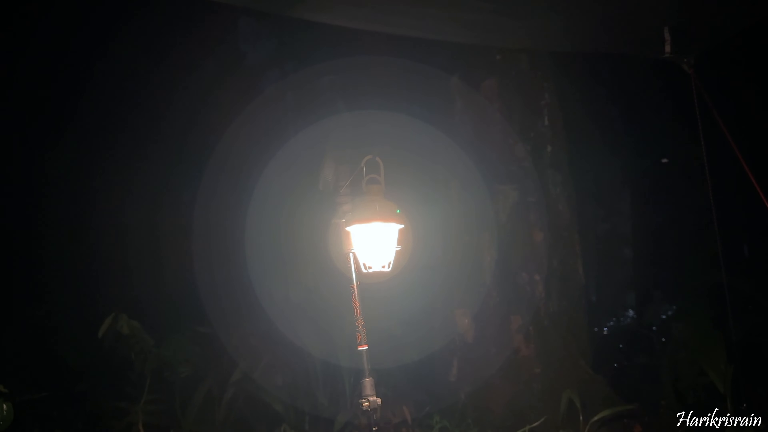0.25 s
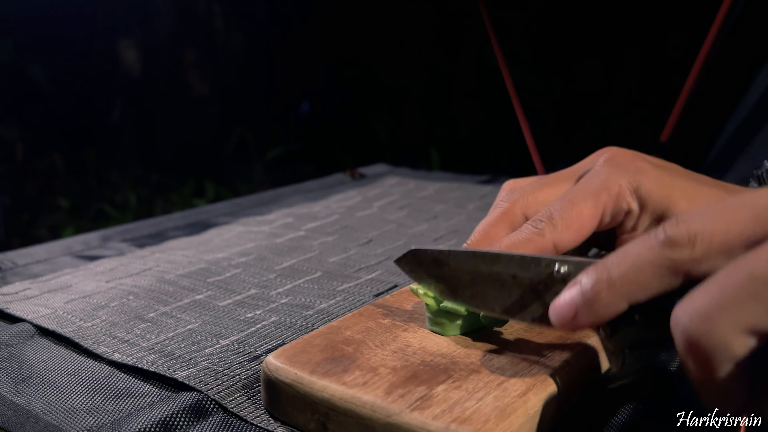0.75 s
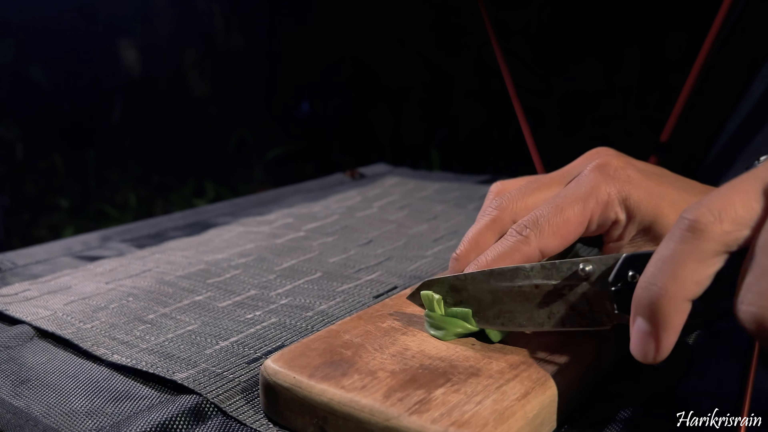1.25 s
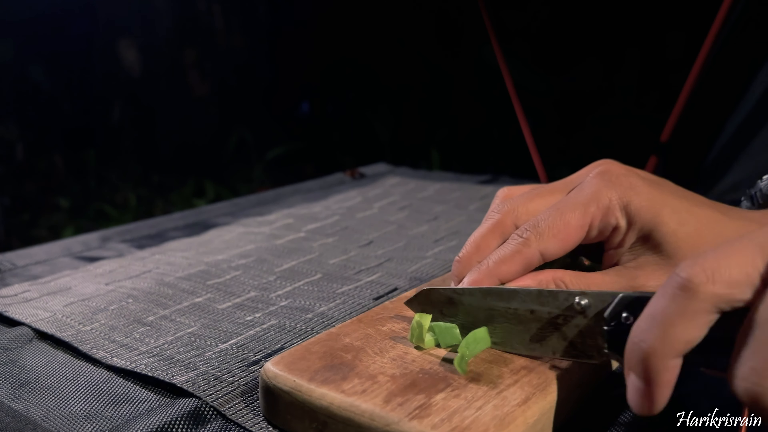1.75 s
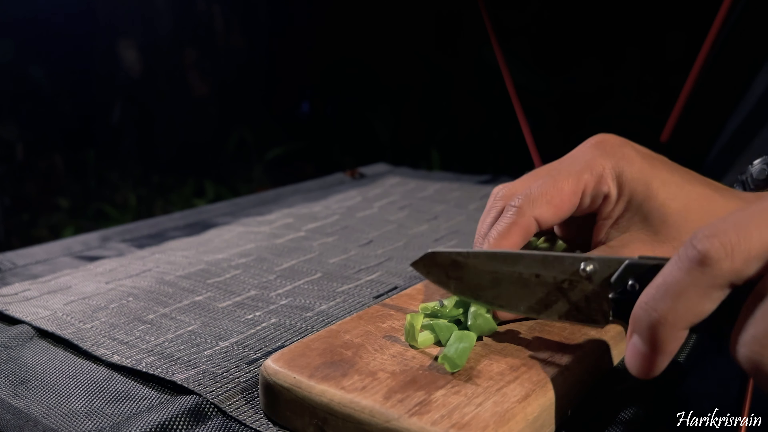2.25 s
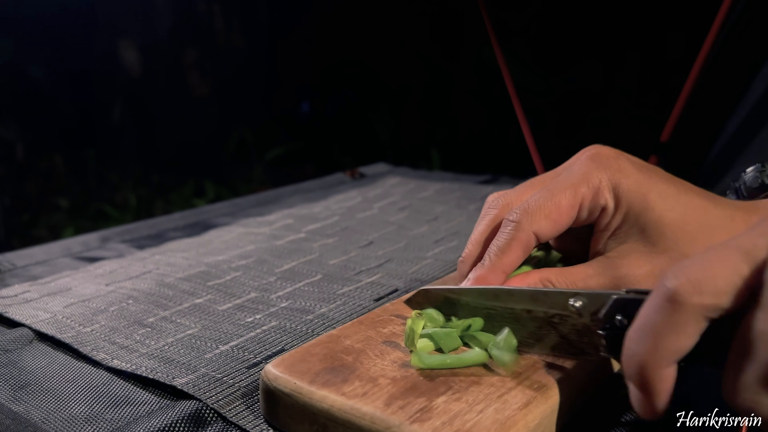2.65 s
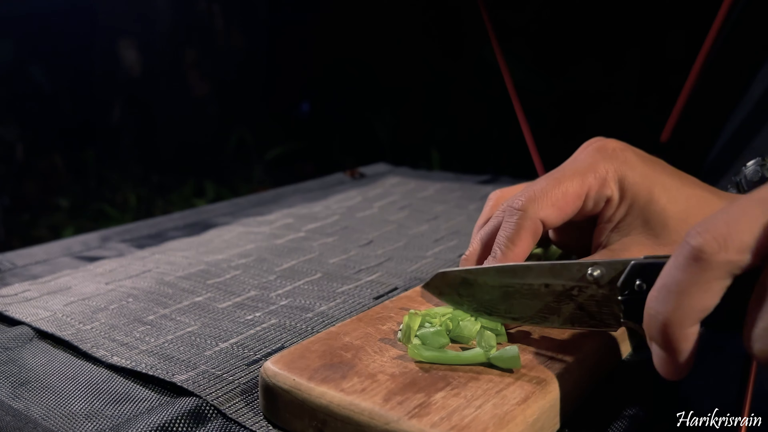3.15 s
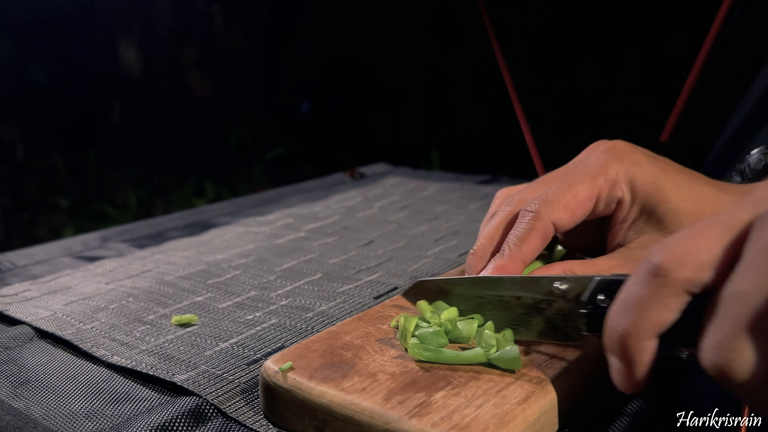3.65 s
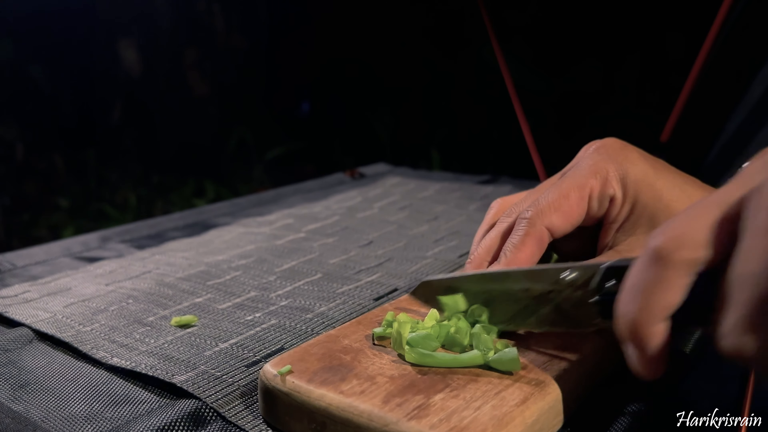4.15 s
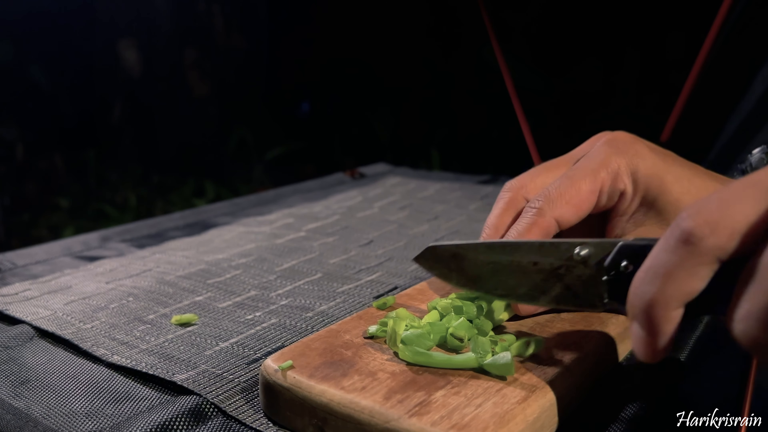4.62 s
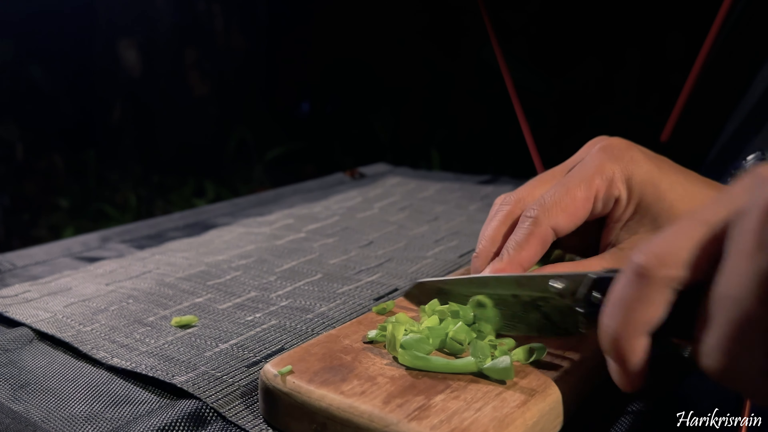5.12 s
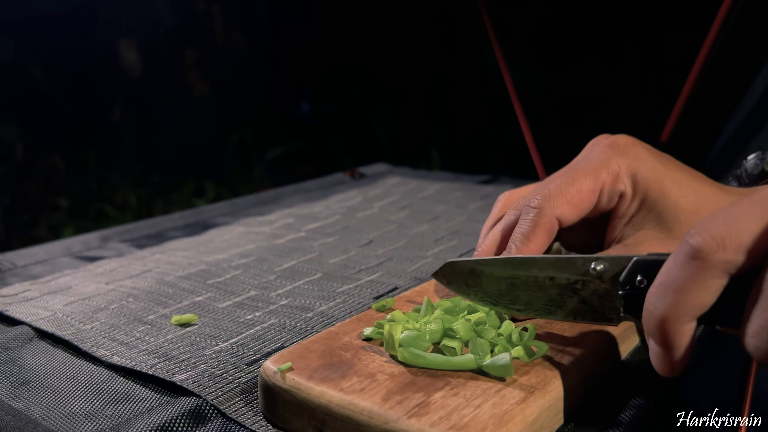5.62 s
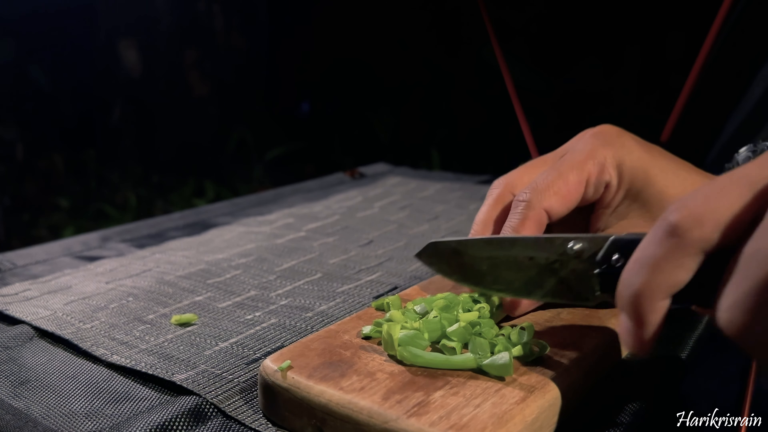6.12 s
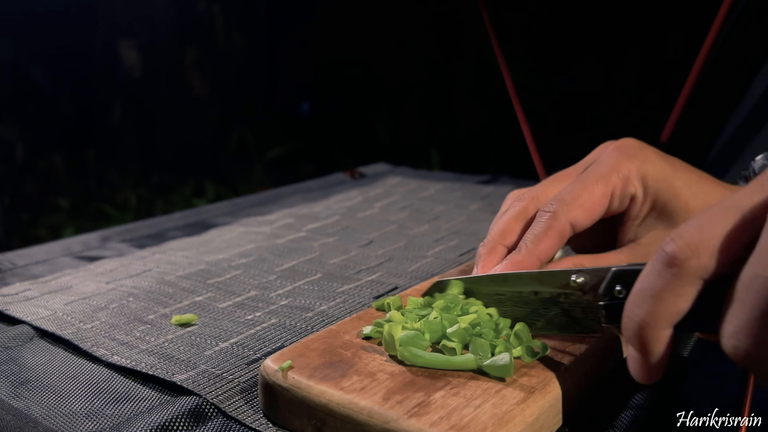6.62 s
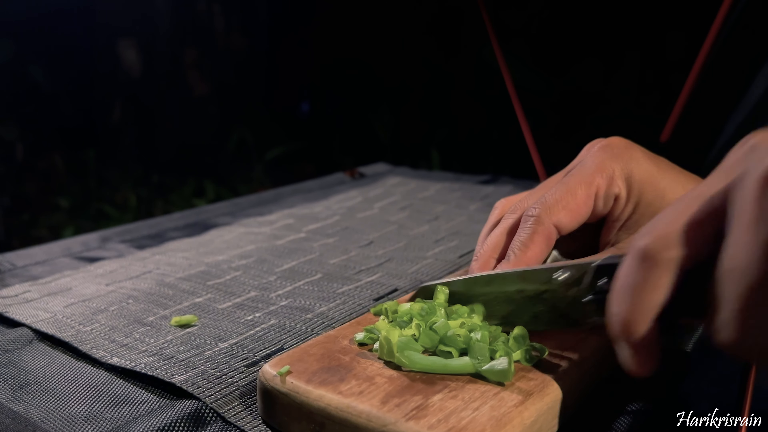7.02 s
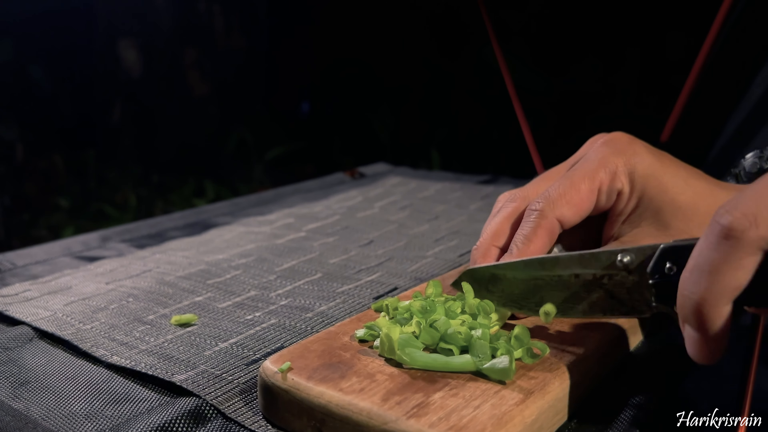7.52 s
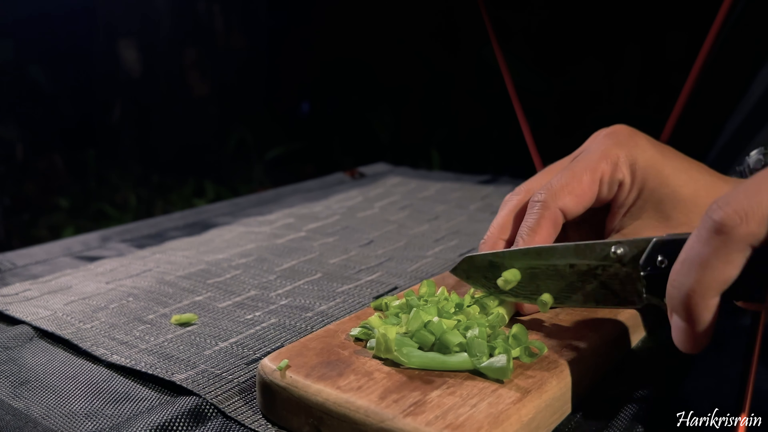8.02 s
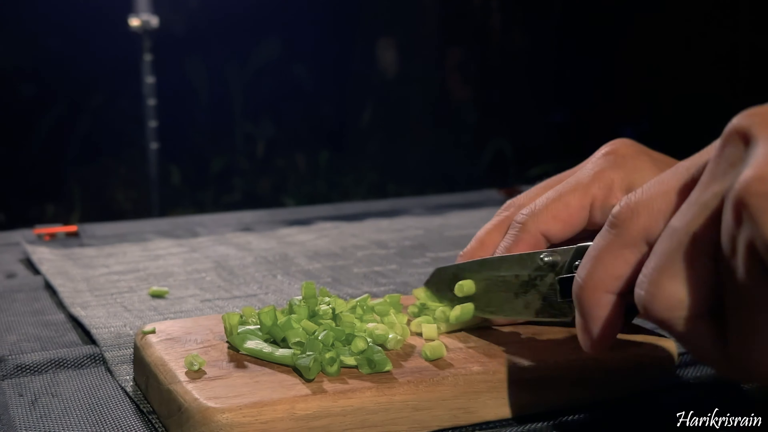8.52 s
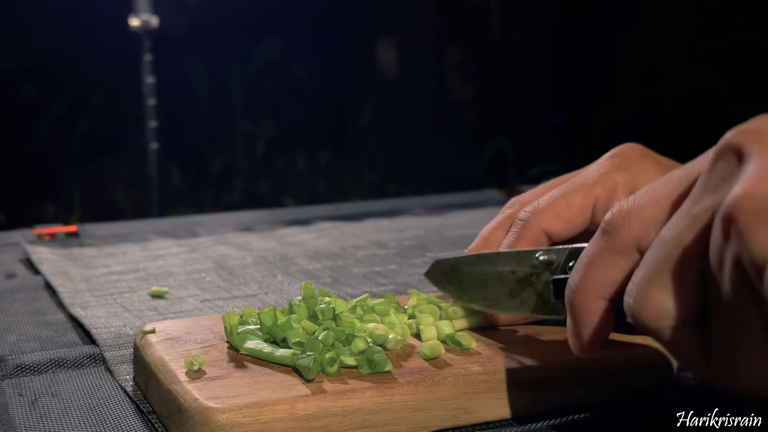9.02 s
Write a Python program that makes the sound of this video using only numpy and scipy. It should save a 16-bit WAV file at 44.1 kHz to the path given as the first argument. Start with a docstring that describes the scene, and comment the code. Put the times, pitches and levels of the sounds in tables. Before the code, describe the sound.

Steady rain and shrill insects jump to a quieter night shelter, where a knife chops crisp peppers with crunchy, knocking strokes on a small board.

```python
"""At first rain rumbles and hisses and insects sing close by; then the listener is at once elsewhere.
There, under a tent at night, rain and fainter insects go on while a knife chops crisp peppers on a small
wooden board. Each stroke crackles through the skins (dense clicks through resonances), shakes the board and
ends in a knock (decaying modes); single skins snap, pieces rustle, mostly as the blade lifts, and the wet
blade squeaks now and then (gliding sines). Rain is shaped noise; insects are ticks through resonances."""
import sys
import numpy as np
from scipy import signal
from scipy.fft import rfft, irfft
from scipy.io import wavfile
from scipy.ndimage import uniform_filter1d, map_coordinates

SR = 44100
rng = np.random.default_rng(int(sys.argv[2]) if len(sys.argv) > 2 else 0)


def to_wav(sig):
    """Store sig (one row per channel, or 1-D mono) as 16-bit WAV at the path in sys.argv[1].

    Samples outside -1..1 are clipped; the rate is SR.
    """
    pcm = np.clip(np.atleast_2d(sig), -1, 1) * 32767
    pcm = np.round(pcm).astype(np.int16)
    wavfile.write(sys.argv[1], SR, pcm.T)  # frames by channels


def volts(x):
    """Linear amplitude factor 10**(x/20) for a level x in dB, scalar or array-like."""
    e = np.asarray(x, float) / 20
    return 10 ** e


N = 408807


def resonance(x, hz, width_hz):
    """Damped resonance: a two-pole band-pass whose gain is 1 at its peak."""
    r = np.exp(-np.pi * width_hz / SR)
    numerator = np.array([1, 0, -1]) * (1 - r * r) / 2
    return signal.lfilter(numerator, [1, -2 * r * np.cos(2 * np.pi * hz / SR), r * r], x + 1e-18)


def ring(clicks, hz, t60):
    """Free decay of a mode: a unit click starts a sine of height 1 that falls 60 dB in t60 seconds."""
    r = volts(-60 / (t60 * SR))
    w = 2 * np.pi * hz / SR
    return signal.lfilter([0, np.sin(w)], [1, -2 * r * np.cos(w), r * r], clicks + 1e-18)


def band(x, low_hz, high_hz, order=2):
    """Band limitation by a Butterworth band-pass."""
    return signal.sosfilt(signal.butter(order, [low_hz, high_hz], "band", fs=SR, output="sos"), x)


def rms_one(x):
    """Power normalisation: scale to a mean square of 1."""
    return x / np.sqrt(np.mean(x ** 2) + 1e-20)


def drift(rate):
    """Random modulation: lines join 2 * rate knots per second, zero after 2000 knots; whole-length rms 1."""
    knots = rng.standard_normal(2000)
    steps = np.arange(N) * 2 * rate / SR
    return rms_one(map_coordinates(knots, [steps], order=1))


def grains(per_s, spread_db):
    """Shot noise: clicks at random times, of either sign and uneven size, scaled to rms 1."""
    chance = rng.uniform(-SR, SR, N) / per_s
    born = np.abs(chance) < 1
    size_db = spread_db * np.minimum(-np.log(np.abs(chance[born]) + 1e-12), 5)
    out = np.zeros(N)
    out[born] = np.sign(chance[born]) * volts(size_db)
    return rms_one(out)


def pan(x, lean_db):
    """Level difference between the ears: left minus right is lean_db."""
    return x * volts(np.multiply([[.5], [-.5]], lean_db))


def rain(spectrum, lean, flicker_db):
    """Superposition: countless far drops merge into noise, alike on both sides in the bass only."""
    # interaural correlation of the rain: (frequency [Hz], left-right likeness [-1 to 1])
    likeness = [(60, 0.97), (130, 0.99), (290, 0.94), (640, 0.67), (1410, -0.38), (3100, 0.24),
                (6820, 0.21), (15000, 0.28)]
    log_hz = np.log(np.maximum(np.fft.rfftfreq(N, 1 / SR), 1))

    def at(rows):
        hz, value = np.transpose(rows)
        return np.interp(log_hz, np.log(hz), value)

    mid, side = rfft(rng.standard_normal((2, N)) * volts(flicker_db * drift(9)))
    alike = np.clip(at(likeness), -1, 1)
    both = np.sqrt(1 + alike) * mid + np.sqrt(1 - alike) * side * [[1], [-1]]
    return rms_one(irfft(pan(both * volts(at(spectrum)), at(lean)), N))


def insects(choruses):
    """Forced resonance: wing ticks excite a narrow body resonance; each side hears other singers."""
    out = np.zeros((2, N))
    for hz, width_hz, level_db, lean_db, per_s, throb, depth_db in choruses:
        ticks = np.array([grains(per_s, 0.83), grains(per_s, 0.83)]) * volts(depth_db * drift(throb))
        song = ticks
        for _ in range(2):  # two equal resonances in series
            song = resonance(song, hz, width_hz * 1.1)
        out += pan(volts(level_db) * rms_one(song), lean_db)
    return out


def drops(level_db):
    """Impact excitation: stray drops tick on the fabric, some towards the left, some towards the right."""
    ticks = np.array([grains(25, 1.9), grains(25, 3.5)]) * volts(3.6 * drift(1.63))
    crossed = ticks + .5 * ticks[::-1]
    return volts(level_db) * rms_one(resonance(crossed, 4700, 4000))


def first_place():
    """Superposition of steady rain and the nearer, louder insects."""
    # rain spectrum before scaling to its level: (frequency [Hz], relative density [dB per Hz])
    spectrum = [(30, -38), (60, -23), (100, -1.5), (200, -0.5), (400, -12), (700, -17.5), (1500, -15),
                (3000, -18.5), (6500, -22), (11500, -32), (15000, -22), (15700, -30), (15900, -68)]
    # balance of the rain: (frequency [Hz], left minus right [dB])
    lean = [(400, 2), (2000, -0.5), (15000, 2)]
    # insect choruses: (pitch [Hz], nominal width [Hz], level [dB], left minus right [dB],
    # wing ticks [per s], throb rate [per s], throb depth [dB])
    choruses = [(8830, 940, -29.5, 2, 1300, 17.3, -0.5), (9880, 910, -28, 6, 1600, 13, 0),
                (12940, 660, -40, 13.5, 890, 38, 1.5), (5530, 200, -54.5, 1.5, 900, 40, 2.5)]
    rain_db = -37
    return volts(rain_db) * rain(spectrum, lean, flicker_db=1.1) + insects(choruses)


def second_place():
    """Superposition of slowly varying rain, fainter insects, phrases of high song and stray drops."""
    # rain spectrum before scaling to its level: (frequency [Hz], relative density [dB per Hz])
    spectrum = [(30, -38), (60, -28.5), (90, -8), (115, 1), (230, -5.5), (400, -14), (550, -23),
                (1000, -28.5), (1500, -25.5), (3400, -27.5), (5800, -32.5), (9000, -36), (12500, -23),
                (15000, -34), (15800, -27), (16000, -70)]
    # balance of the rain: (frequency [Hz], left minus right [dB])
    lean = [(100, 0), (1500, -2), (4400, -0.5), (15000, -6)]
    # course of the rain's loudness: (time [s], level [dB])
    rain_level = [(.76, -29.5), (3.0, -30), (6.0, -31), (8.8, -29.5), (9.27, -29)]
    # steady insects, then the highest ones: (pitch [Hz], nominal width [Hz], level [dB],
    # left minus right [dB], wing ticks [per s], throb rate [per s], throb depth [dB])
    choruses = [(7660, 1320, -38, -2.5, 1500, 24, 1.1), (9580, 320, -48.5, -8, 1900, 2.5, 1.5)]
    high_choruses = [(13930, 90, -52, -4, 1500, 6, 1.5), (14100, 700, -46, -1, 1500, 6, 1.5)]
    # phrases of the highest song: (start [s], end [s])
    phrases = [(2.2, 3.8), (5.1, 6.6), (7.9, 8.45), (8.9, 9.27)]
    t = np.arange(N) / SR
    gate = sum(1. * (t > start) * (t < end) for start, end in phrases)
    singing = uniform_filter1d(gate, size=2000)  # soft phrase edges
    loudness = volts(np.interp(t, *np.transpose(rain_level)))
    weather = loudness * rain(spectrum, lean, flicker_db=1.32)
    return weather + insects(choruses) + singing * insects(high_choruses) + drops(level_db=-56.5)


def near(x, lean_db, scatter_db, scatter_s, lag_s=.000016):
    """Time difference and scattering: left hears later; ground and fabric echo oppositely on the sides."""
    turn = np.exp(-2j * np.pi * np.fft.rfftfreq(N, 1 / SR) * lag_s)
    late = irfft(rfft(x) * turn, N)
    echoes = rng.standard_normal(700) * np.exp(-np.arange(700) / SR / scatter_s)
    scattered = signal.fftconvolve(x, echoes / np.sqrt(np.sum(echoes ** 2)))[:N]
    return pan(np.array([late, x]), lean_db) + volts(scatter_db) * scattered * [[1], [-1]]


def squeaks():
    """Stick-slip on the wet steel as the blade is drawn out: a gliding tone, the first one wavering."""
    # one table a squeak: (time [s], pitch [Hz], level [dB])
    glides = [
        [(3.352, 3300, -43), (3.361, 3300, -24), (3.378, 4400, -28), (3.398, 3300, -25), (3.412, 2480, -43)],
        [(4.299, 5800, -42), (4.304, 5300, -23), (4.311, 5200, -45)],
        [(8.248, 3550, -31), (8.261, 5200, -32), (8.272, 6200, -31)],
    ]
    t, out = np.arange(N) / SR, np.zeros(N)
    waver = 1 + .04 * drift(250)  # its knots end at 4 s, after the first squeak
    for glide in glides:
        s, hz, level_db = np.transpose(glide)
        on = slice(round(s[0] * SR), round(s[-1] * SR))
        phase = 2 * np.pi * np.cumsum(np.interp(t[on], s, hz) * waver[on]) / SR
        out[on] = volts(np.interp(t[on], s, level_db)) * np.sin(phase)
    return out


def board():
    """Modal excitation: the blade shakes the board softly, then strikes it; each blow weighs modes anew."""
    # blows: (time [s], blow strength before weighting [dB], relative shudder before it [dB],
    # shudder length [s])
    knocks = [(1.426, -9.5, -23.5, 0.021), (2.524, -8, -23, 0.028), (3.267, -12, -20, .018),
              (3.647, -20, -30, 0.0034), (3.666, -19, -31, 0.0059), (3.727, -14, -44, .004),
              (3.74, -20, -31.5, 0.019), (4.192, -3, -23.5, 0.029), (4.438, -18, -23, 0.0077),
              (5.064, -5.5, -18.5, 0.036), (5.734, -7, -11.5, .015), (6.391, -6.5, -13, 0.023),
              (7.04, -5, -17, 0.026), (7.632, -7, -21.5, 0.039), (7.809, -18, -32, 0.0068),
              (8.181, -10.5, -16.5, 0.035), (8.664, -12.5, -24.5, 0.022), (9.189, -12, -25, 0.016)]
    # modes of the board: (frequency [Hz], relative level [dB], t60 [s])
    modes = [(291, 1.5, 0.022), (341, -1.5, 0.043), (414.4, -1.5, 0.036), (642, -5, 0.024),
             (806, -5, 0.017), (1084, -2.5, 0.0088), (1750, -2.5, 0.0088)]
    t, shake, out = np.arange(N) / SR, np.zeros(N), np.zeros(N)
    for s, _, shudder_db, length in knocks:
        on = slice(round((s - length) * SR), round(s * SR))
        shake[on] += volts(shudder_db + 3.04 * (t[on] - s) / length)  # swells towards the blow
    at = [round(row[0] * SR) for row in knocks]
    blow_db = np.array(knocks)[:, 1]
    weights_db = rng.normal(0, 2.4, (len(knocks), len(modes)))
    rough = band(grains(2500, 2.17), 67, 840, order=1)  # the flesh cushions the push: little treble
    for k, (hz, level_db, t60) in enumerate(modes):
        force = volts(-20.5) * shake * rough
        # softer blows lose their treble first
        force[at] += volts(blow_db * (1 + hz / 4000) - 4.5 + weights_db[:, k])
        out += (-1) ** k * volts(level_db) * ring(force, hz, t60)
    return band(out, 70, 5000)  # a small board radiates no deep bass


def snaps():
    """Sudden release of strain: a heavily damped cosine, gone in a few cycles, with a brief fizz."""
    # single skins snapping: (time [s], level before the band-pass [dB], pitch [Hz])
    skins = [(0.7668, -13, 6450), (1.2823, -15, 5640), (1.2926, -12.5, 5660), (1.31, -10.5, 4910),
             (1.3152, -11, 7290), (1.3263, -11, 6100), (1.4073, -4, 5780), (1.5164, -13, 5360),
             (1.5435, -9, 6120), (1.5529, -8, 6640), (1.703, -6.5, 5340), (2.2882, -15, 5000),
             (2.3429, -17, 4970), (2.419, -8, 6880), (2.499, -5, 4700), (2.6435, 4, 5740),
             (3.1981, -17, 4410), (3.276, -1.5, 3520), (4.0498, -14.5, 3330), (4.0755, -14, 6000),
             (4.089, -10.5, 6380), (4.1253, -13, 6430), (4.1927, -1.5, 3450), (4.2807, -7.5, 3160),
             (4.581, -3.5, 6550), (4.7206, -10.5, 9650), (4.9335, -11, 7370), (5.0297, -5, 3040),
             (5.0361, -7, 6100), (5.0411, .2, 3400), (5.1479, -4, 5030), (5.1711, -10.5, 5400),
             (5.6466, -15, 4820), (5.6673, -9, 8380), (5.7221, -5, 5380), (5.8426, -14, 4530),
             (5.8686, -16, 3580), (6.233, -16.5, 7440), (6.3591, -13, 5280), (6.3671, -2.5, 2760),
             (6.3885, -1.5, 3550), (6.4886, -4.5, 5000), (7.0041, -12, 3330), (7.1017, .2, 7400),
             (7.1126, -5, 4900), (7.1668, -15, 3480), (7.5964, -6, 5680), (7.6032, -3.5, 3080),
             (7.6134, .2, 5500), (7.6258, 1.5, 6900), (7.7158, -4.5, 6770), (7.8188, -17, 7310),
             (7.8734, -19.5, 3960), (8.1461, 3, 4050), (8.1538, .2, 6040), (8.1914, -5, 2600),
             (8.2236, -18, 3280), (8.2466, -5, 5320), (8.6285, -15, 5990), (8.6511, -1.2, 6640),
             (8.7286, -10.5, 6910), (8.735, -11.5, 5230), (8.7415, -13, 5110), (9.1371, -13.5, 3900),
             (9.1726, -11, 3250), (9.1806, -12, 3820)]
    out = np.zeros(N + SR)
    t = np.arange(600) / SR
    fizz = rng.standard_normal((len(skins), len(t)))
    for (s, level_db, hz), noise in zip(skins, fizz):
        pop = np.cos(2 * np.pi * hz * t) * np.exp(-t * hz / 1.2)
        brief_fizz = 0.3 * noise * np.exp(-t / 0.00027)
        out[round(s * SR):][:len(t)] += volts(level_db) * (pop + brief_fizz)
    return band(out[:N], 1660, 14500)


def blade():
    """Envelopes of fracture: how hard cells burst deep and lightly, and how much juice sprays."""
    # chops: (blade presses [s], skins give [s], blade through [s], press level as skins give [dB],
    # cut level at first [dB], cut level at last [dB])
    chops = [(1.287, 1.403, 1.435, -41, -24, -17), (2.332, 2.492, 2.526, -35.5, -24, -17),
             (3.19, 3.251, 3.278, -32, -18, -17.5), (4.05, 4.167, 4.199, -39, -16, -17),
             (4.927, 5.035, 5.067, -36, -22, -18), (5.645, 5.721, 5.739, -36, -13.5, -15),
             (6.28, 6.367, 6.393, -35, -17, -14), (6.93, 7.019, 7.042, -37, -18, -17.5),
             (7.54, 7.597, 7.634, -33, -21.5, -21.5), (8.09, 8.146, 8.187, -35, -20.5, -17),
             (8.587, 8.628, 8.669, -37, -29, -18), (9.137, 9.16, 9.194, -36, -27, -20.5)]
    # rustling pieces: (peak time [s], rise [s], fall [s], peak level [dB], spray against crackle [dB])
    rustles = [(.905, .003, .1, -37.5, -1), (1.51, .003, .08, -37, 9), (1.545, .003, .09, -32, 4),
               (1.64, .003, .08, -38, -3), (1.31, .021, .1, -35, 6), (1.703, .005, .045, -25, .2),
               (1.79, .003, .07, -34, -3), (2.418, .003, .08, -32, 5), (2.643, .06, .04, -25, -5),
               (2.728, .003, .11, -35, -4), (3.38, .045, .055, -28, -1), (3.49, .021, .1, -40, 1.2),
               (4.088, .021, .021, -33, 4), (4.13, .012, .03, -35, 8), (4.283, .026, .045, -24, -6),
               (4.38, .03, .12, -38, .2), (4.58, .003, .021, -33, 9), (5.17, .04, .06, -24.5, -4),
               (5.27, .005, .12, -37, -8), (5.668, .003, .045, -34, 7), (5.84, .05, .05, -28, -2.2),
               (6.487, .03, .025, -26, .2), (6.7, .003, .07, -39, -1.2), (7.0, .006, .03, -33, 3),
               (7.115, .021, .05, -22, -6), (7.16, .021, .06, -40, -6), (7.71, .04, .04, -30, -3),
               (7.786, .003, .07, -37, -8), (8.247, .004, .07, -26, -5), (8.728, .003, .05, -33, -8),
               (9.268, .021, .021, -30, 2.2)]
    press_swell_db = 9  # growth of the press until the skins give
    settle_drop_db, settle_db_per_s = 9.5, 620  # once through, the crackle drops and dies
    press_treble_db, cut_treble_db, settle_treble_db = 7.5, .2, -2.5  # spray against crackle
    edge_db = 20  # a rise or fall spans this much
    roundness = 1.7  # 1 a pointed top, 2 a round one
    t = np.arange(N) / SR
    deep, light, treble = np.zeros((3, N))
    for press_s, give_s, through_s, press_db, first_db, last_db in chops:
        on = slice(round(press_s * SR), round((through_s + .15) * SR))
        phase = [t[on] < give_s, t[on] < through_s]
        pressing = np.interp(t[on], [press_s, give_s], [press_db - press_swell_db, press_db])
        cutting = np.interp(t[on], [give_s, through_s], [first_db, last_db])
        settling = last_db - settle_drop_db - settle_db_per_s * (t[on] - through_s)
        burst = volts(np.select(phase, [pressing, cutting], settling))
        light[on] += burst * phase[0]
        deep[on] += burst * ~phase[0]
        treble[on] += burst * volts(np.select(phase, [press_treble_db, cut_treble_db], settle_treble_db))
    for s, rise_s, fall_s, peak_db, treble_db in rustles:
        on = slice(round((s - rise_s) * SR), round((s + fall_s) * SR))
        away = np.abs(t[on] - s) / np.where(t[on] < s, rise_s, fall_s)
        burst = volts(peak_db - edge_db * away ** roundness)
        light[on] += burst
        treble[on] += burst * volts(treble_db)
    return deep, light, treble


def crackle():
    """Brittle fracture: cells burst in uneven clicks, each size at its own pitch; juice sprays brightly."""
    # resonances of the flesh and blade: (frequency [Hz], width [Hz], relative level [dB])
    flesh = [(1660, 1070, -10), (3155, 1700, 1), (4400, 1840, -1), (6480, 4400, -4), (8700, 1280, -0.5)]
    light_low_hz = 2100  # light touches lack the low tear of the cut
    deep, light, treble = blade()
    shared = grains(1500, 2.3) * volts(2.0 * drift(150))  # larger tears sound at all pitches at once

    def bursts():
        return .55 * shared + grains(1400, 2.5) * volts(3.0 * drift(120))

    body = sum(volts(db) * resonance(bursts(), hz, width_hz) for hz, width_hz, db in flesh)
    spray = band(bursts() + grains(6000, 1.5), 7650, 18400, order=3)
    thin = rms_one(band(body, light_low_hz, 13000, order=1))
    cut = deep * rms_one(band(body, 1150, 11600))
    touch = light * rms_one(band(thin, 1250, 11600))
    return cut + touch + treble * rms_one(spray)


def scene():
    """Superposition: the first place gives way at once to the second, and the knife is added."""
    move_s = .75  # the listener changes place
    moved = np.clip((np.arange(N) / SR - move_s) / 0.0031, 0, 1)
    background = (1 - moved) * first_place() + moved * second_place()
    knife = near(crackle() + squeaks(), lean_db=.6, scatter_db=-6.5, scatter_s=.004)
    knife += near(snaps(), lean_db=-1.0, scatter_db=-7, scatter_s=0.0024)
    knife += near(board(), lean_db=-2.0, scatter_db=-12.5, scatter_s=0.0057)
    return background + knife


def band_limit(x):
    """A steep low-pass at the top of the band."""
    return signal.sosfilt(signal.butter(12, 16430, fs=SR, output="sos"), x)


def record(dry):
    """Low-pass filtering and limited range: the top is cut and peaks beyond full scale are clipped."""
    low_pass = signal.cheby2(12, 50, 16300, fs=SR, output="sos")
    mix = np.clip(signal.sosfilt(low_pass, dry), -1, 1)
    return band_limit(mix)


dry = scene()
out = record(dry)
to_wav(out)
```